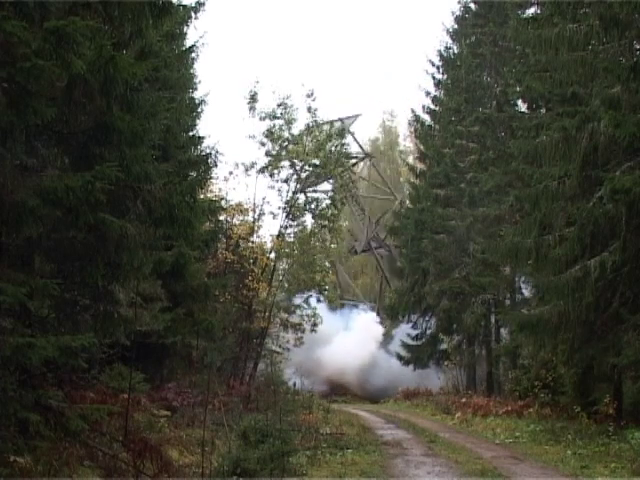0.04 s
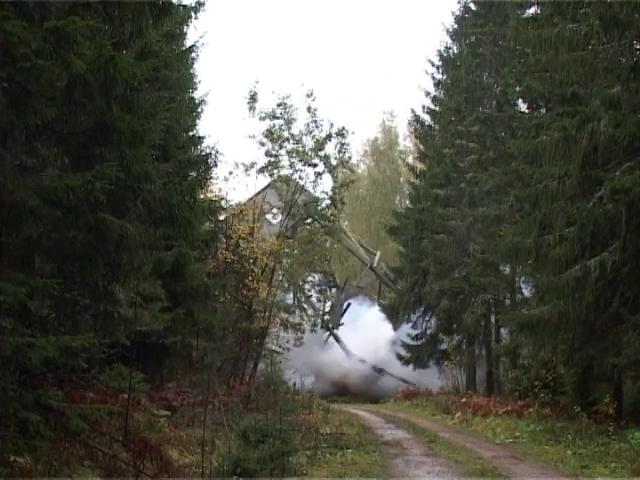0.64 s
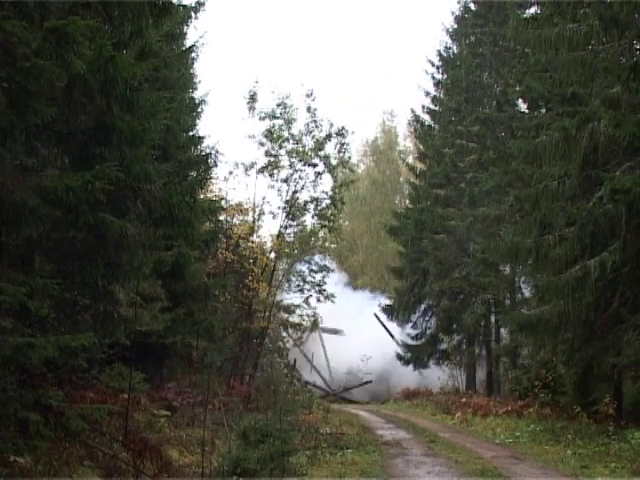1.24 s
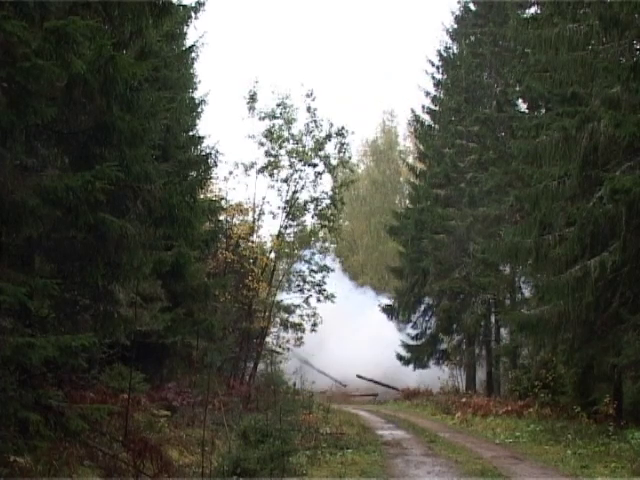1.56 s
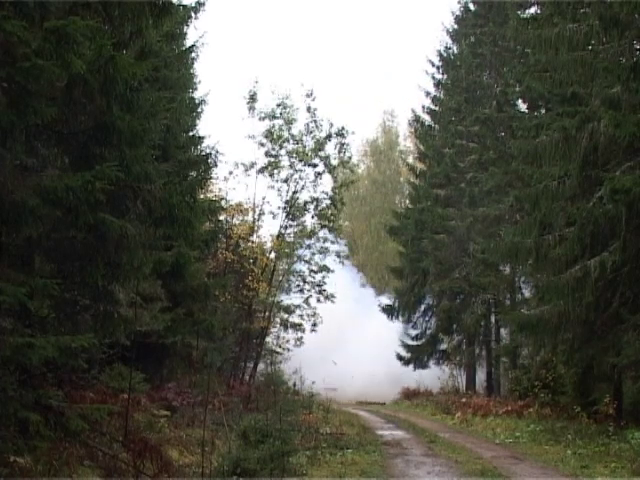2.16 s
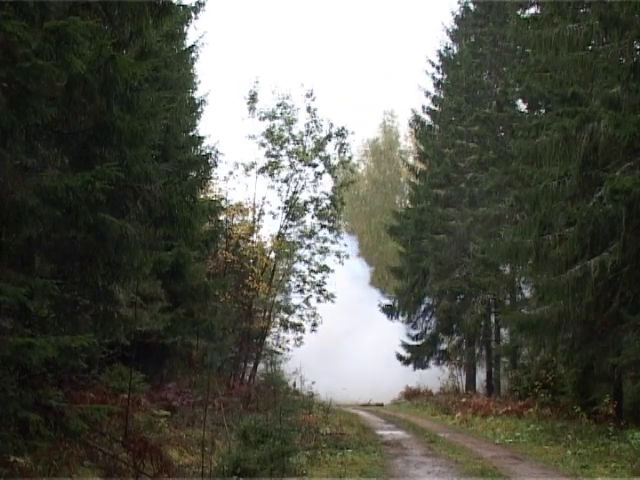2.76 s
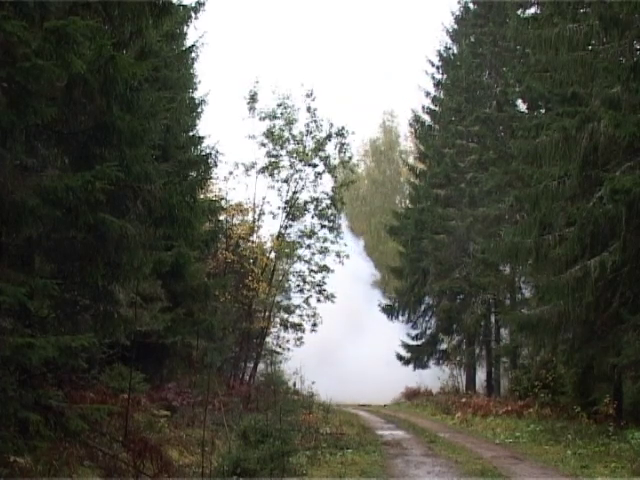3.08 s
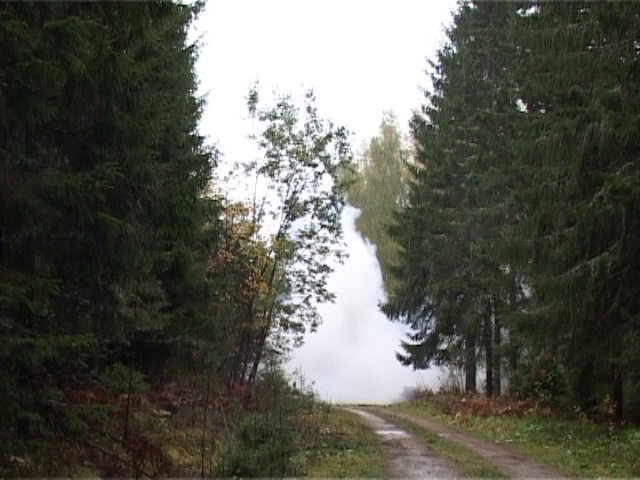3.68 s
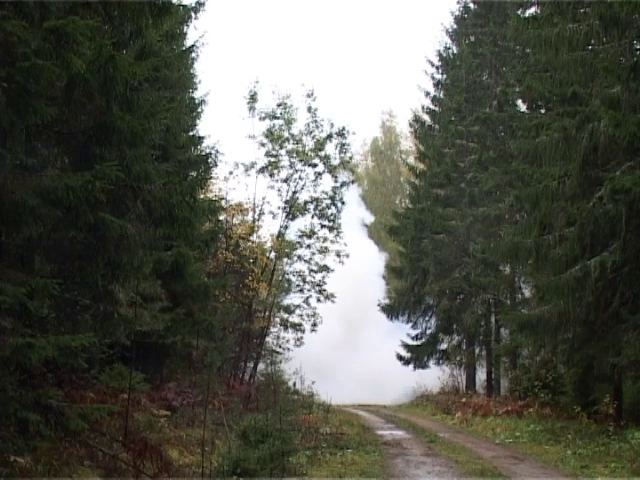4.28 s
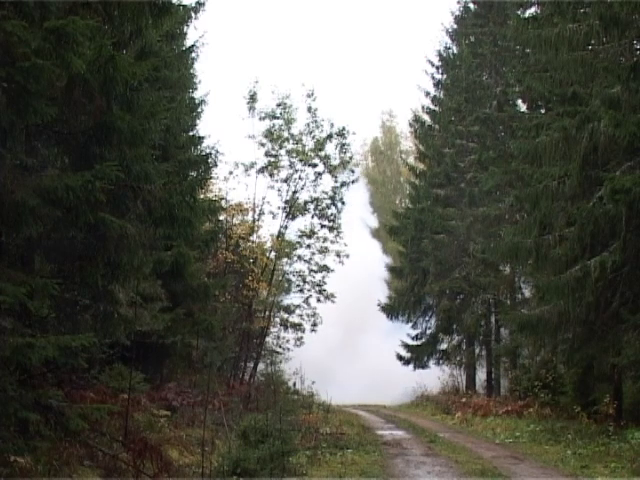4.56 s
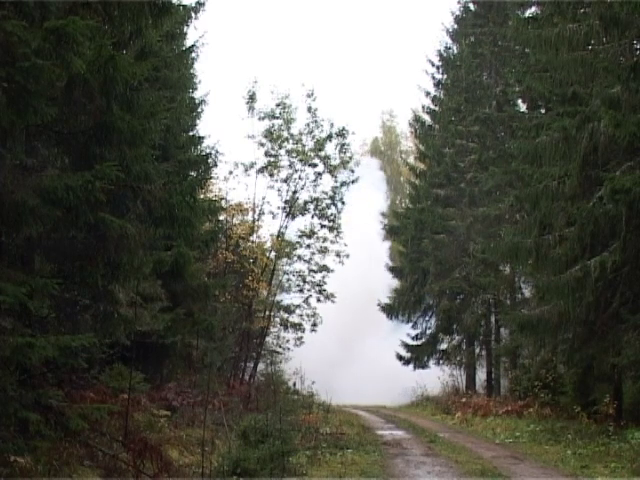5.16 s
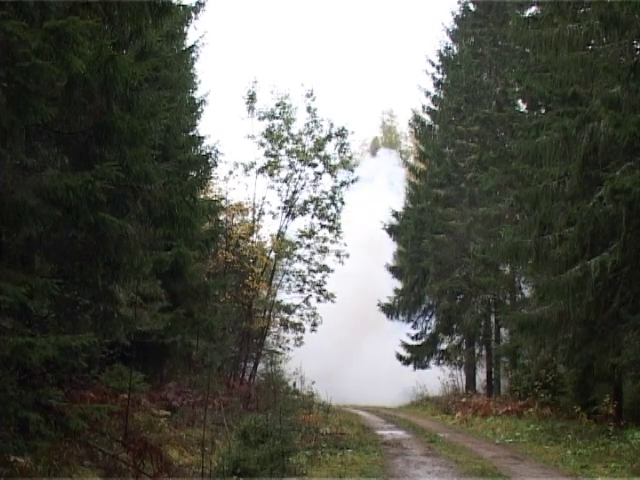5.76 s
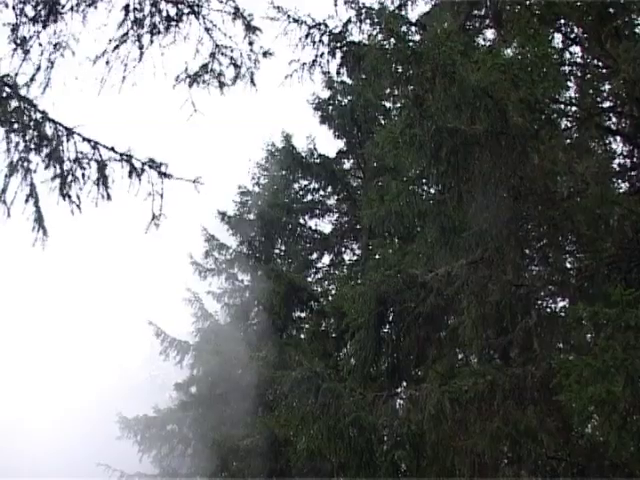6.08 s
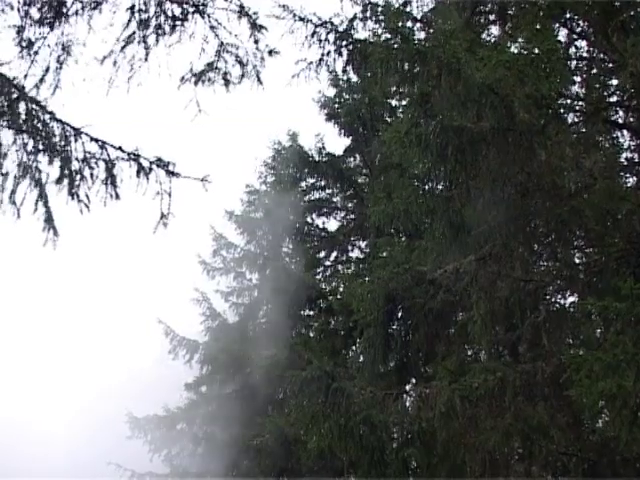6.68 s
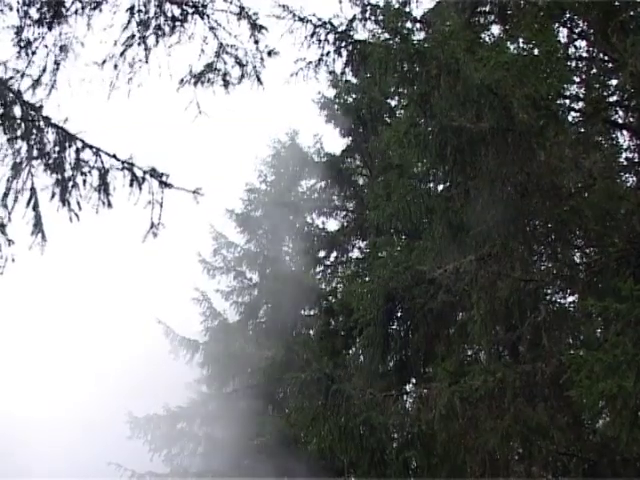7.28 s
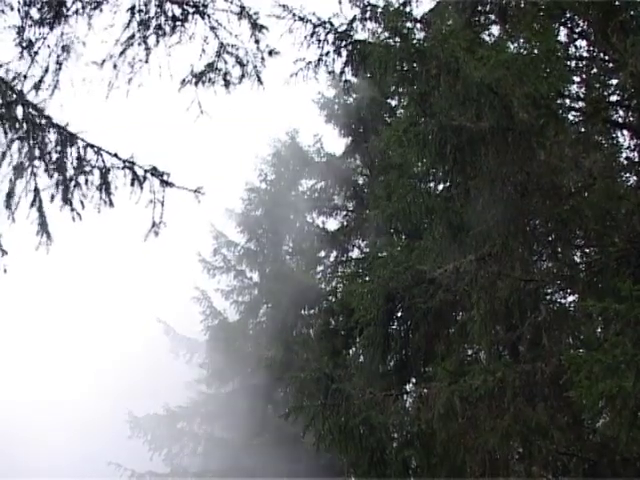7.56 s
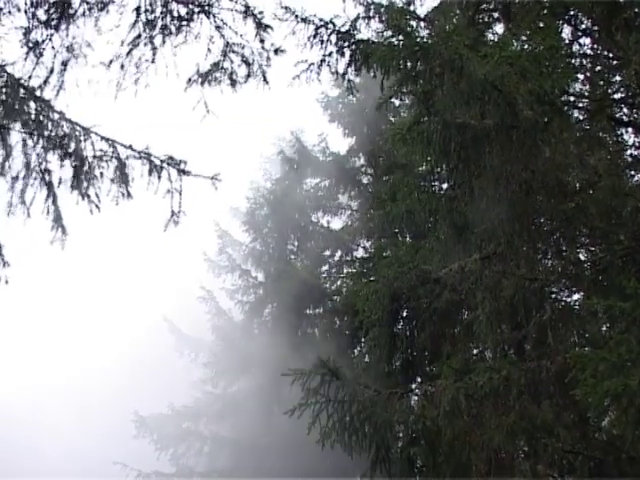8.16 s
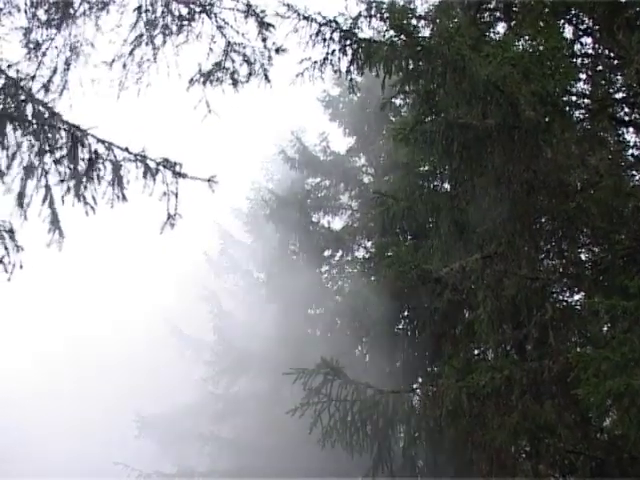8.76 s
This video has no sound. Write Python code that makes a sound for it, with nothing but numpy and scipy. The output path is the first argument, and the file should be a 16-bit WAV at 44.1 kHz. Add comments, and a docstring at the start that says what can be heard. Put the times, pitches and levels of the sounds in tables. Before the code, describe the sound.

A blast's echo rolls through a forest as a wooden tower cracks and crashes down, then a sharp bang and close microphone bumps.

```python
"""A blast's echo rolls through a spruce forest while the beams of a blasted wooden tower snap and knock.
The frame crashes down, splintering and shaking the ground; a last sharp report starts a new echo.
Impacts radiate short pressure pulses, and scattering by the trunks draws the bangs out into a roll.
A far bird whistles, then the echo breaks off and a handled camera thumps, clicks and rustles.
A faint breeze and microphone hiss lie underneath."""
import sys
import numpy as np
from scipy import signal
from scipy.fft import rfft, irfft, next_fast_len
from scipy.io import wavfile
from scipy.ndimage import map_coordinates

SR = 44100
rng = np.random.default_rng(int(sys.argv[2]) if len(sys.argv) > 2 else 0)


def pcm_store(signal):
    """Save signal as 16-bit PCM."""
    levels = np.round(np.clip(np.atleast_2d(signal), -1, 1) * 32767)
    wavfile.write(sys.argv[1], SR, levels.astype(np.int16).T)


N = 393813
T = np.arange(N) / SR
AGE = np.arange(SR // 3) / SR  # time since the onset of one event, in s
BLAST_S, CRASH_S, REPORT_S, HANDLING_S = -1, 1.537, 3.374, 6.11


# beam strikes beam: t/s, peak level/dB, f/Hz
BEAM_BLOWS = [(.2718, -6, 745), (.5955, -12.5, 730), (1.2135, -12.5, 800), (1.226, -13.5, 680),
              (1.285, -17, 627), (1.423, -17, 380), (1.5722, -2.5, 480), (1.5849, 0, 600),
              (1.623, -12.5, 330), (1.809, -9, 350), (1.9475, -13, 620)]
# beam lands on soil: t/s, nominal level/dB, f/Hz
SOIL_THUDS = [(1.238, -29, 92.5), (1.287, -14, 332), (1.418, -11.5, 286), (1.443, -16, 352),
              (1.539, -9, 316), (1.572, -26, 90), (1.668, -18.5, 116), (1.762, -21, 288), (1.821, -12, 226),
              (1.851, -22, 172), (2.111, -23, 195), (2.544, -25, 247), (2.949, -35.5, 119),
              (3.563, -26, 123)]

def timbers():
    """Impact: wood on wood gives a pulse that is shorter the harder the blow; soil gives a dull thud."""
    out = np.zeros(N)
    for s, db, hz in BEAM_BLOWS:
        add(out, s, db, pulse(hz, cycles=0.37 * amp(-0.5 * db)))
        crushed_fibres = band_noise(hz, width=0.89) * decay(t60=0.061)
        add(out, s, db - 14.5, crushed_fibres)
    for s, db, hz in SOIL_THUDS:
        soil = lowpass(rng.standard_normal(len(AGE)), 2 * hz) * decay(t60=0.095)
        add(out, s, db - 8, pulse(hz, cycles=1.8))
        add(out, s, db - 6, soil)
    return out


# parts of the frame give way: t/s, duration/s, splinter level/dB, twig level/dB, ground level/dB
FRAME_BREAKS = [(0, 0.17, -52, -50, -46), (0.25, 0.19, -35, -43, -48), (0.69, 0.29, -46, -48.5, -56),
                (1.191, 0.04, -39, -40, -36.5), (1.277, 0.1, -30, -42.5, -53),
                (1.46, 0.11, -30, -38.5, -32.5), (1.552, 0.11, -19.5, -32.5, -25.5),
                (2.875, 0.041, -60, -58, -77)]
# spectra of splintering planks, crackling twigs and shaking ground: f/Hz, relative level/dB
SPLINTER_SPECTRUM = [(150, -10), (210, 6), (350, 6), (600, 5), (1000, 6), (1250, -5.5), (1480, 1),
                     (1900, -0.5), (2600, -7.5), (4000, -13), (9000, -46)]
TWIG_SPECTRUM = [(800, -5), (2000, 4.5), (3000, -1), (4200, 1), (5000, -5), (5900, -3), (7400, -12.5),
                 (8300, -26), (9200, -16.5), (12000, -25.5)]
GROUND_SPECTRUM = [(20, -10), (90, 8), (220, 9), (330, -0.5), (600, -3), (2000, -75)]

def collapse():
    """Brittle fracture: planks and twigs fail in swarms of cracks as the frame shakes the ground."""
    _, _, splinter_db, twig_db, ground_db = np.transpose(FRAME_BREAKS)
    planks = clatter(rate=600, spread_db=4, hz=1500, cycles=1.2)
    sticks = clatter(rate=300, spread_db=4.5, hz=4000, cycles=0.9)
    # the noise is the share of the cracks already smeared by the trees
    splinters = coloured(planks + 3.4 * noise(), SPLINTER_SPECTRUM)
    twigs = coloured(sticks + 1.93 * noise(), TWIG_SPECTRUM)
    ground = coloured(impulses(rate=700, spread_db=2), GROUND_SPECTRUM)
    splinters *= break_envelope(splinter_db, fall_db_per_s=34.5)
    twigs *= break_envelope(twig_db, fall_db_per_s=42)
    ground *= break_envelope(ground_db, fall_db_per_s=47)
    return (splinters + twigs) * flutter(rate=29.78, depth_db=1) + ground


def break_envelope(levels_db, fall_db_per_s):
    """Incoherent sources add in power: each break swells and dies, leaving a tail of settling debris."""
    power, rise_s = 0, 0.016
    for (s, length, *_), db in zip(FRAME_BREAKS, levels_db):
        fracture = swell(s, length, rise_s, fall_db_per_s)
        debris = amp(-19.5) ** 2 * swell(s, length, rise_s, fall_db_per_s=13)
        power += amp(db) ** 2 * (fracture + debris)
    return np.sqrt(power)


# wood snaps and the last pieces drop: t/s, level at the source/dB, f/Hz, ringing share (0-1)
WOOD_SNAPS = [(.053, -39, 5500, 0), (.161, -33.5, 4150, .1), (.270, -33, 2400, 0.2),
              (.341, -29.5, 3550, 0.74), (.401, -28, 2870, 0.4), (.608, -39, 6750, .8),
              (.719, -35.5, 4600, 0), (.733, -26, 2700, 0.2), (.839, -31, 2280, 0.2),
              (.855, -34.5, 5600, 0), (.91, -32, 3500, 0.7), (.975, -33.5, 3150, 0.5),
              (1.035, -34, 3100, 0.6), (1.216, -30.5, 4150, 0), (1.408, -21.5, 1850, 0.9),
              (1.563, -33, 3650, .1), (1.624, -13.5, 1850, 0.9), (2.543, -39, 2200, 0.2),
              (3.583, -39, 1740, 0.74), (4.76, -45, 1650, 0.4)]

def snapping_wood():
    """Absorption: distance and needles take the top off the cracks of snapping wood."""
    cracks = ticks(WOOD_SNAPS, t60=0.024, width=0.65, rise_s=0.0012, jitter_rad=0.11)
    return lowpass(cracks, 9500)


def report():
    """A pressure transient: one sharp swing with a crack on its front, then a low boom."""
    out = np.zeros(N)
    add(out, REPORT_S, -11, pulse(620, cycles=0.34))
    add(out, REPORT_S - 0.0005, -27, pulse(2800, cycles=0.16))
    add(out, REPORT_S + 0.0012, -25, pulse(224, cycles=0.57))
    add(out, REPORT_S + 0.013, -32, pulse(66, cycles=0.9))
    return out


# echoes of the blast (before t = 0), the crash and the report:
# t/s, level/dB, absorption/(dB/s), time in which spreading halves the power/s
FOREST_ECHOES = [(BLAST_S, -7, 5.95, 0.5), (CRASH_S, -22.5, 12.3, 0.8), (REPORT_S, -31, 3.64, 0.85)]
# spectra of the early and the late roll: f/Hz, relative level/dB
EARLY_SPECTRUM = [(25, -24), (140, -29), (200, -14.5), (330, -5), (600, 1.5), (820, 0.5), (1050, -5.5),
                  (1270, -16), (1800, -25.5), (3000, -37.5), (8000, -86)]
LATE_SPECTRUM = [(25, -14), (125, -13), (185, -1), (330, 3.5), (560, 5), (780, 1), (1040, -8.5),
                 (1270, -21), (1750, -23.5), (2500, -39), (8000, -51)]

def forest_echo():
    """Multiple scattering: thousands of trunks return each bang, weaker the longer the path."""
    first_return_s, power = 0.0096, 0
    for s, db, absorption, halving_s in FOREST_ECHOES:
        returns = swell(s + first_return_s, length=0, rise_s=0.013, fall_db_per_s=absorption)
        spreading = 1 + np.maximum(T - s, 0) / halving_s
        power += amp(db) ** 2 * returns / spreading
    early = coloured(impulses(rate=12000, spread_db=2), EARLY_SPECTRUM)
    late = coloured(impulses(rate=12000, spread_db=2), LATE_SPECTRUM)
    late_share = fade_in(0, 6.85)
    roll = np.sqrt(1 - late_share) * early + np.sqrt(late_share) * late
    cutoff = 1 - fade_in(HANDLING_S, 0.02)
    return np.sqrt(power) * cutoff * flutter(rate=14, depth_db=0.5) * roll


def near_trunks(x, t60):
    """Reverberation: nearby trees scatter a short tail after a sound."""
    tail = rng.standard_normal(len(AGE)) * decay(t60) * (1 - np.exp(-AGE / 0.0037))
    return signal.fftconvolve(x, tail / np.linalg.norm(tail))[:N]


# bumps on the camera: t/s, case peak level/dB, sway peak level/dB, sway f/Hz
CAMERA_BUMPS = [(6.173, -30.5, -26, 103), (6.39, -30, -44, 75.8), (6.404, -46, -22.5, 62),
                (6.48, -33, -25, 58), (6.504, -49, -26, 65.3), (6.767, -26, -32, 58.6),
                (7.008, -40, -25.5, 53.7), (7.11, -24, -31, 55.4), (7.233, -32, -39, 60),
                (7.552, -29, -33, 60), (7.6282, -7, -17.5, 58)]
# modes of its case: f/Hz, relative level/dB, T60/s
CASE_MODES = [(125, -12, 0.16), (189.5, -0.5, 0.075), (293, -5.5, 0.17), (323, -2, 0.096), (413, -11, 0.11),
              (580, -6, 0.03), (776, -8.5, 0.044), (1220, -16, .015), (1720, -2, 0.013), (2090, -7, 0.026)]

def camera_bumps():
    """Modal vibration: a bump rings the case, brighter when harder, and rocks the camera's mount."""
    out = np.zeros(N)
    for s, case_db, sway_db, sway_hz in CAMERA_BUMPS:
        ring = sum(amp(db) * decay(t60) * np.sin(2 * np.pi * (hz * AGE + rng.normal(0, 0.23)))
                   for hz, db, t60 in CASE_MODES)
        contact_hz = 1400 * amp(0.5 * case_db)
        through_shell = lowpass(lowpass(ring, contact_hz), 2400, order=4)
        add(out, s, case_db, through_shell)
        add(out, s, sway_db, pulse(sway_hz, cycles=0.71))
    return out


# the hand shifts on the camera: t/s, duration/s, sway level/dB, rustle level/dB
GRIP_SHIFTS = [(6.11, 0.36, -42.5, -44.5), (6.892, 0.28, -41.5, -53), (7.437, 0.39, -44.5, -49),
               (7.914, 0.49, -67, -48.5)]
# spectra of the swaying body and the rubbing skin: f/Hz, relative level/dB
SWAY_SPECTRUM = [(15, -24), (40, 1.5), (60, -1), (90, -5.5), (130, -19.5), (1000, -65)]
RUSTLE_SPECTRUM = [(100, -15), (180, 15.5), (380, -1), (750, 6), (1700, -2.5), (2500, -9.5), (3200, -21),
                   (9000, -31)]

def hand_grip():
    """Stick-slip friction: skin rustles on the case in short scrapes as the hand sways the camera."""
    sway_power, rustle_power = amp(-48.5) ** 2, amp(-53.5) ** 2  # the hand at rest
    for s, length, sway_db, rustle_db in GRIP_SHIFTS:
        shift = swell(s, length, rise_s=0.047, fall_db_per_s=55)
        sway_power += amp(sway_db) ** 2 * shift
        rustle_power += amp(rustle_db) ** 2 * shift
    sway = np.sqrt(sway_power) * flutter(rate=15, depth_db=2.7) * coloured(noise(), SWAY_SPECTRUM)
    catches = clatter(rate=120, spread_db=3, hz=1700, cycles=0.8)
    slips = unit(flutter(rate=45, depth_db=2.2) * noise())
    rustle = np.sqrt(rustle_power) * coloured(0.22 * catches + slips, RUSTLE_SPECTRUM)
    return (sway + rustle) * fade_in(HANDLING_S, 0.0085)


# the camera's parts click: t/s, peak level/dB, f/Hz, ringing share (0-1)
PART_CLICKS = [(6.112, -30.5, 2070, .65), (6.1125, -28, 875, 0.2), (6.23, -35.5, 4400, 0.43),
               (6.2305, -40, 2200, 0.5), (6.231, -25, 580, .6), (6.308, -38, 750, .3),
               (6.482, -41, 2000, .1), (7.008, -26, 2200, 0.88), (7.0085, -27, 930, 0),
               (7.6285, -43, 3500, 0.1)]

def camera_clicks():
    """Damped vibration: small parts click and fall silent within milliseconds."""
    return ticks(PART_CLICKS, t60=0.011, width=0.58, rise_s=0.00021, jitter_rad=0.05)


def bird():
    """Frequency modulation: a far bird's one whistle sags in pitch, hoarse with phase jitter."""
    out = np.zeros(N)
    hz, length_s = 1900 - 1100 * AGE, 0.15
    phase = 2 * np.pi * np.cumsum(hz) / SR + phase_drift(jitter_rad=0.08)
    arch = np.sin(np.pi * np.minimum(AGE / length_s, 1))
    add(out, s=5.87, db=-51.5, sound=np.sin(phase) * arch)
    return near_trunks(out, t60=0.1)


# air in the treetops: f/Hz, relative level/dB
BREEZE_SPECTRUM = [(30, -12), (120, -4.5), (250, 2.5), (700, -1.5), (1050, -7), (1300, -17), (1800, -15.5),
                   (2600, -37), (8000, -47)]

def breeze():
    """Flow noise: air moves faintly and steadily through the treetops."""
    return amp(-51) * coloured(noise(), BREEZE_SPECTRUM)


# the microphone's noise floor: f/Hz, relative level/dB
HISS_SPECTRUM = [(30, 6.5), (4000, 2), (12000, -1)]

def hiss():
    """Self-noise: the microphone's hiss, which steps up as the last report arrives."""
    step = fade_in(REPORT_S - 0.002, 0.0041)
    return ((1 - step) * amp(-74) + step * amp(-61)) * coloured(noise(), HISS_SPECTRUM)


def ticks(rows, t60, width, rise_s, jitter_rad):
    """Impulsive excitation: each snap or click is a broad crack plus the piece's brief, uneven ring."""
    out = np.zeros(N)
    envelope = decay(t60) * (1 - np.exp(-AGE / rise_s))
    for s, db, hz, ring_share in rows:
        ring = unit(np.sin(2 * np.pi * hz * AGE + phase_drift(jitter_rad)))
        crack = band_noise(hz, width)
        add(out, s, db, ((1 - ring_share) * crack + ring_share * ring) * envelope)
    return out


def clatter(rate, spread_db, hz, cycles):
    """Superposition of random small cracks, each a damped sine of its own pitch, size and life."""
    count = int(rate * N / SR)
    pitch, size, sign, life = rng.standard_normal((count, 4)).T[:, :, None]
    start = rng.integers(0, N, (count, 1))
    age = np.arange(SR // 64)
    turns = hz * np.exp(0.733 * pitch) * age / SR
    gain = amp(spread_db * np.clip(size, -2, 2)) * np.sign(sign)
    envelope = np.exp(-turns / (cycles * np.exp(0.5 * life))) * (1 - age / len(age))
    cracks = gain * np.sin(2 * np.pi * turns) * envelope
    return unit(np.bincount((start + age).ravel(), cracks.ravel(), N)[:N])


def pulse(hz, cycles):
    """A damped pressure swing whose envelope peaks after the given number of cycles."""
    u = hz * AGE / cycles
    return np.sin(2 * np.pi * hz * AGE) * u * np.exp(1 - u)


def impulses(rate, spread_db):
    """Shot noise: randomly timed impulses of uneven size and sign."""
    hits = rng.random(N) < rate / SR
    return unit(hits * np.sign(noise()) * amp(spread_db * np.clip(noise(), -2, 2)))


def noise():
    """White Gaussian noise."""
    return rng.standard_normal(N)


def band_noise(hz, width):
    """A short stretch of band-passed noise around hz, at rms 1."""
    band = signal.butter(1, [hz / (1 + width), min(hz * (1 + width), SR / 3)], "band", fs=SR)
    return unit(signal.lfilter(*band, signal.lfilter(*band, rng.standard_normal(len(AGE)))))


def phase_drift(jitter_rad):
    """A random walk of phase, which broadens a tone."""
    return np.cumsum(rng.normal(0, jitter_rad, len(AGE)))


def flutter(rate, depth_db):
    """Amplitude modulation: a smooth random gain with rate knots a second."""
    knots = rng.standard_normal(int(N * rate / SR) + 4)
    return amp(depth_db * map_coordinates(knots, [T * rate]))


def swell(s, length, rise_s, fall_db_per_s):
    """Power that rises at s, holds until s + length, then decays exponentially."""
    return (fade_in(s, rise_s) * amp(-fall_db_per_s * np.maximum(T - s - length, 0))) ** 2


def decay(t60):
    """Exponential damping by 60 dB in t60 seconds."""
    return amp(-60 * AGE / t60)


def fade_in(s, length):
    """A linear ramp from 0 to 1 that starts at s."""
    return np.clip((T - s) / length, 0, 1)


def lowpass(x, hz, order=2):
    """Attenuate x above the corner frequency."""
    return signal.lfilter(*signal.butter(order, hz, fs=SR), x)


def filtered(x, response):
    """Multiply the spectrum of x by a frequency response."""
    m = next_fast_len(N + 8192)
    return irfft(rfft(x, m) * response(np.fft.rfftfreq(m, 1 / SR)), m)[:N]


def coloured(x, spectrum):
    """Shape x by (f/Hz, level/dB) points, at rms 1."""
    f, db = np.transpose(spectrum)
    return unit(filtered(x, lambda hz: amp(np.interp(np.log(hz + 1), np.log(f), db))))


def add(track, s, db, sound):
    """Place a sound at time s with its peak at db."""
    part = track[max(round(s * SR), 0):][:len(sound)]
    part += amp(db) * sound[:len(part)] / np.abs(sound).max()


def amp(db):
    """Decibels to gain."""
    return 10 ** (db / 20)


def unit(x):
    """Scale to rms 1."""
    return x / np.sqrt(np.mean(x ** 2) + 1e-20)


def scene():
    """Superposition: the fall, its echoes, the camera and the background add in one channel."""
    snaps = snapping_wood()
    knocks = timbers()
    tails = amp(-11.5) * near_trunks(snaps, t60=0.15) + amp(-27) * near_trunks(knocks, t60=0.47)
    forest = forest_echo() + collapse() + snaps + knocks + tails + report() + bird()
    handling = hand_grip() + camera_bumps() + camera_clicks()
    return (forest + handling + breeze() + hiss())[None]


def record(dry):
    """Transducer limits: the camera notches the bass, saturates at full scale and cuts the top treble."""
    notch = signal.iirnotch(150.3, Q=5.4, fs=SR)
    saturated = np.clip(signal.lfilter(*notch, dry[0]), -1, 1)
    return filtered(saturated, lambda hz: hz < 11900)[None]


dry = scene()
out = record(dry)
pcm_store(out)
```